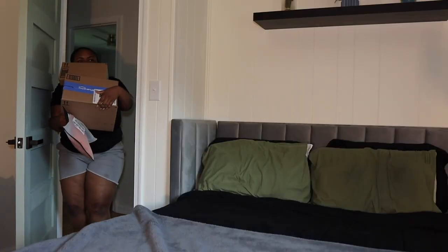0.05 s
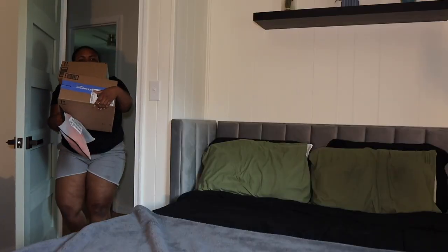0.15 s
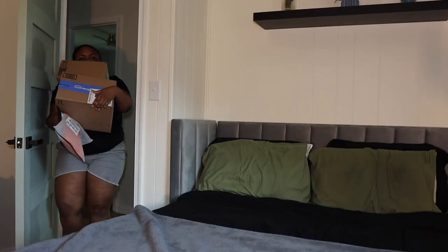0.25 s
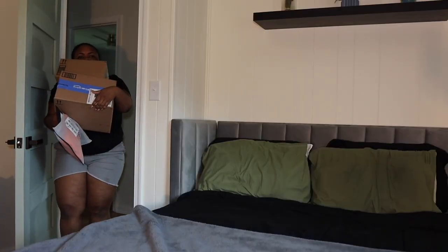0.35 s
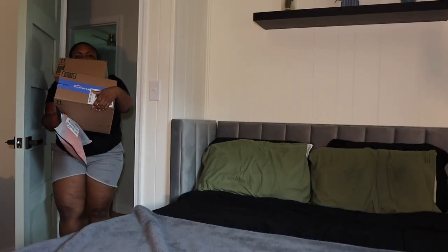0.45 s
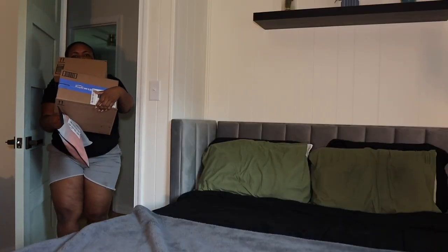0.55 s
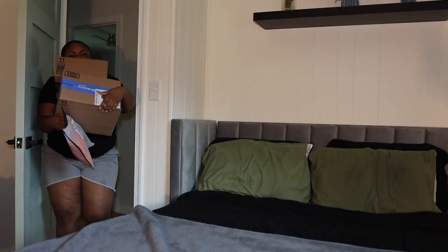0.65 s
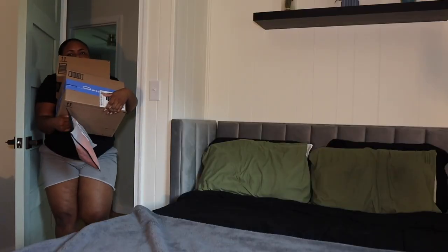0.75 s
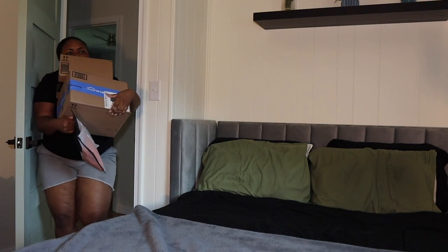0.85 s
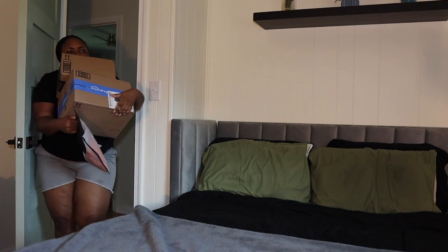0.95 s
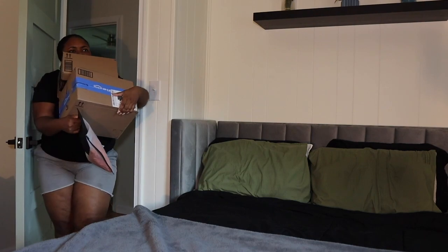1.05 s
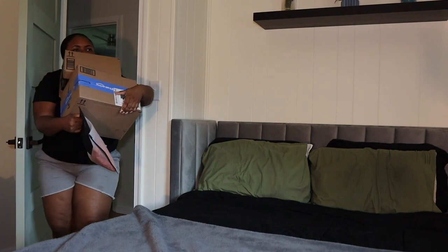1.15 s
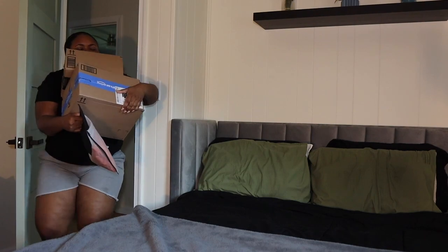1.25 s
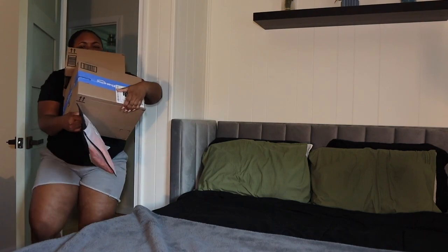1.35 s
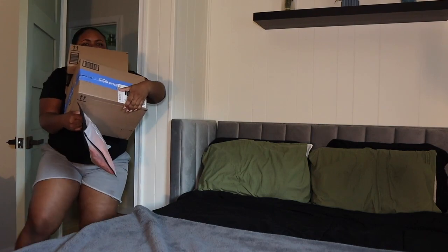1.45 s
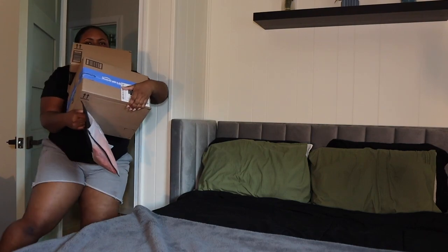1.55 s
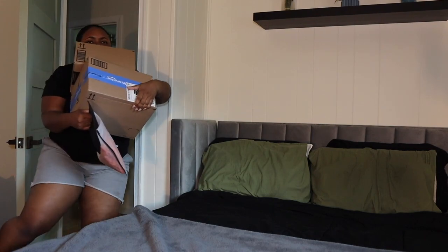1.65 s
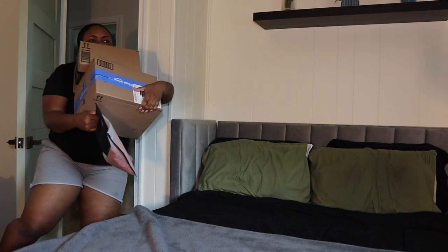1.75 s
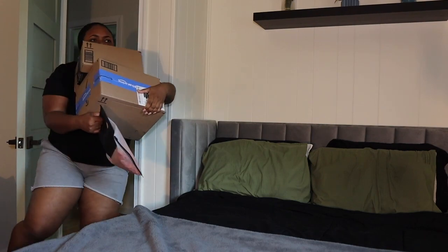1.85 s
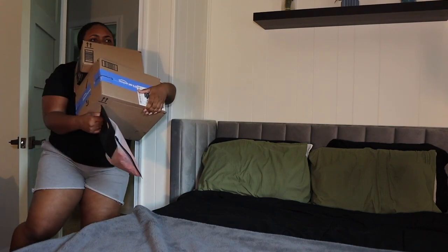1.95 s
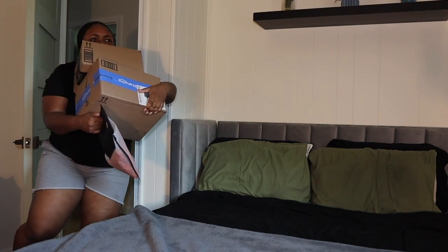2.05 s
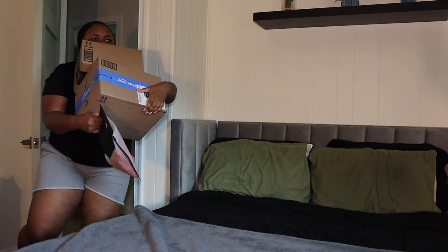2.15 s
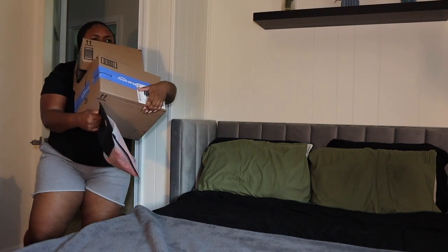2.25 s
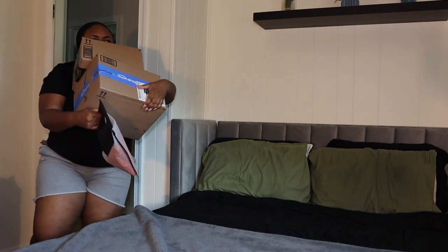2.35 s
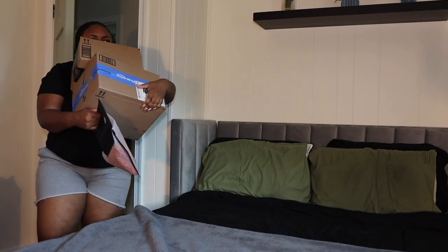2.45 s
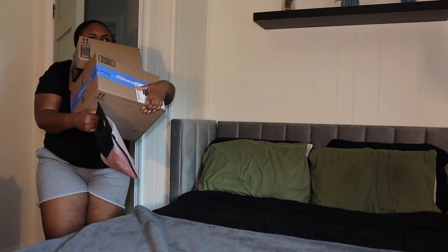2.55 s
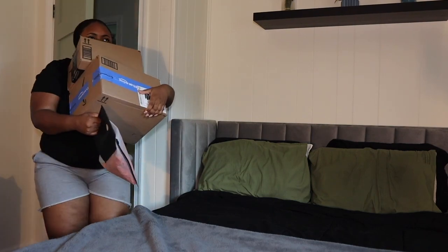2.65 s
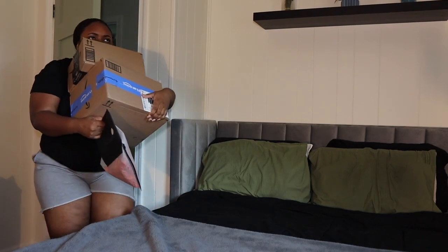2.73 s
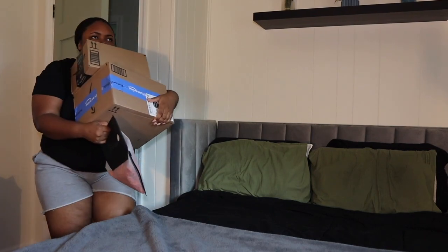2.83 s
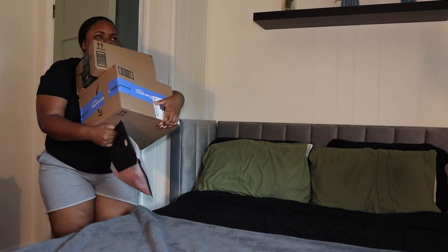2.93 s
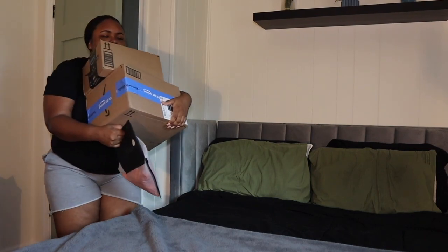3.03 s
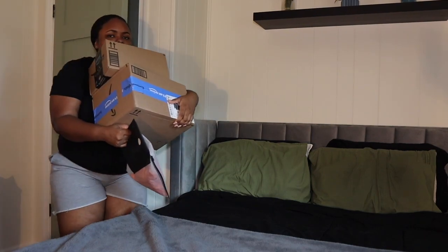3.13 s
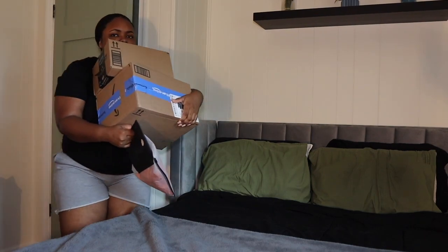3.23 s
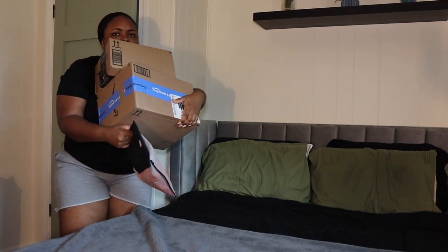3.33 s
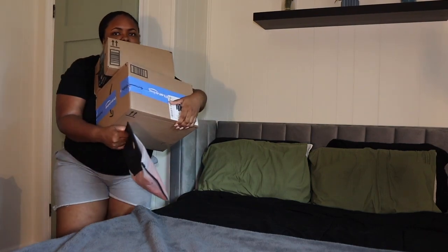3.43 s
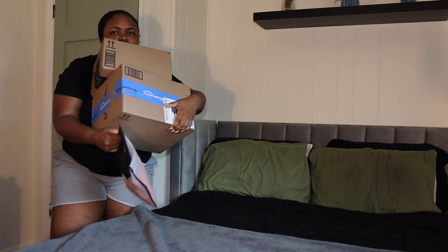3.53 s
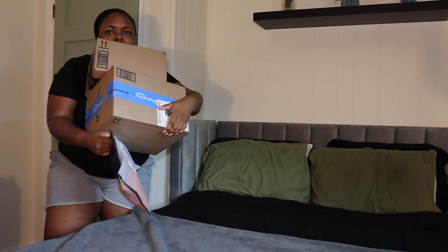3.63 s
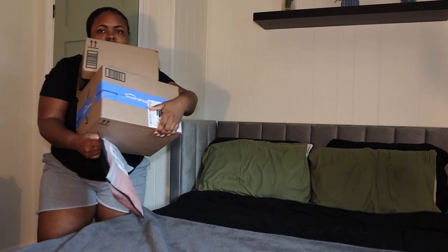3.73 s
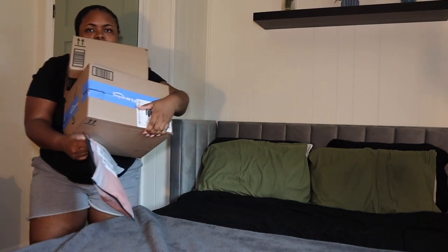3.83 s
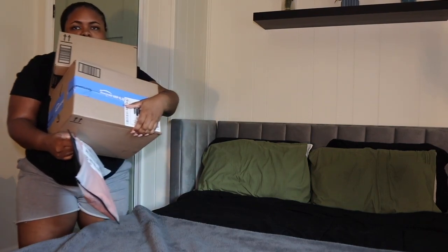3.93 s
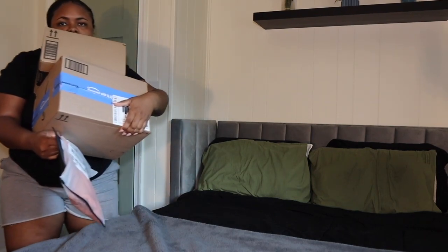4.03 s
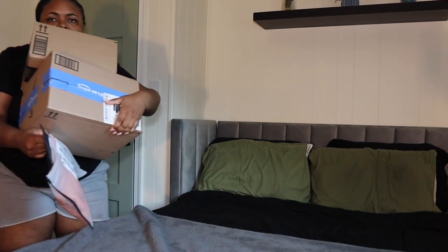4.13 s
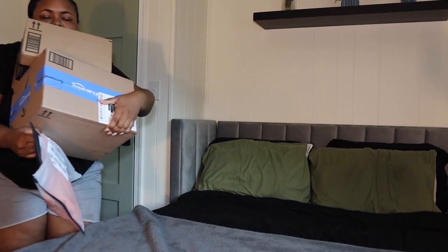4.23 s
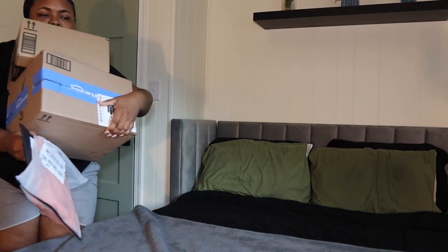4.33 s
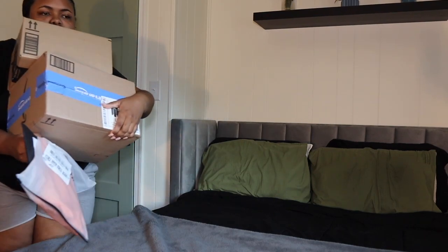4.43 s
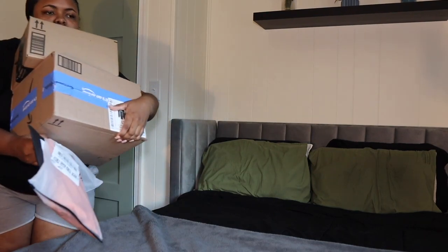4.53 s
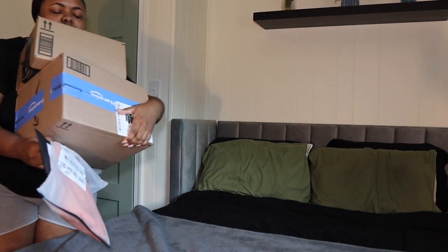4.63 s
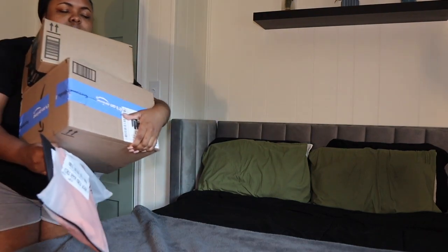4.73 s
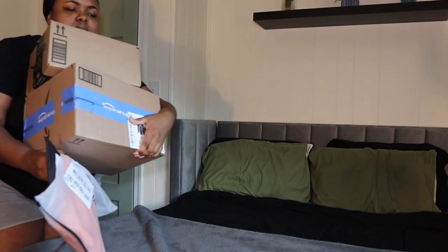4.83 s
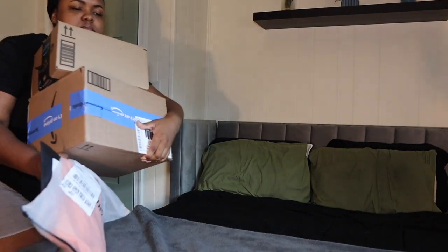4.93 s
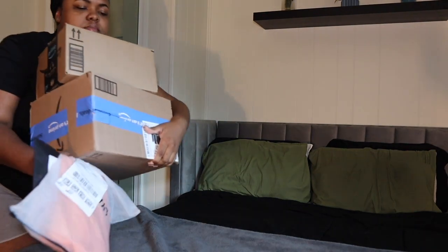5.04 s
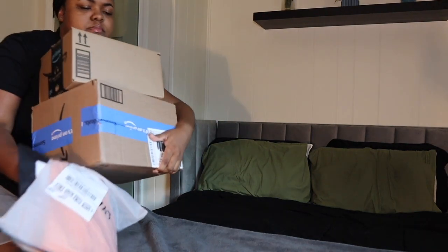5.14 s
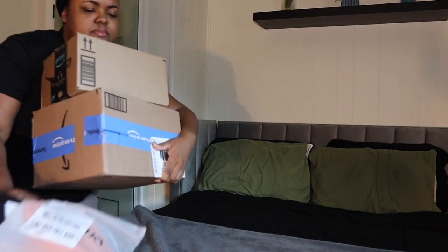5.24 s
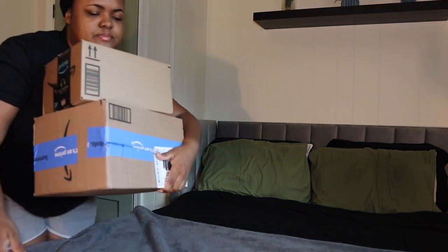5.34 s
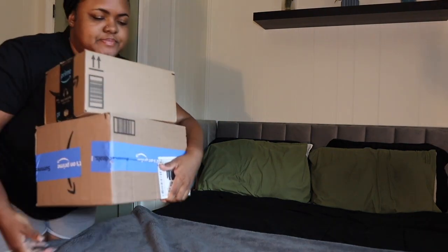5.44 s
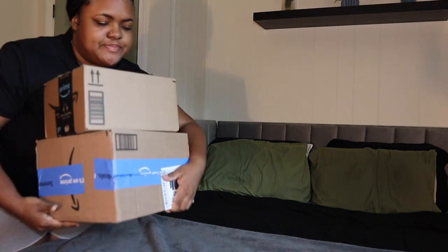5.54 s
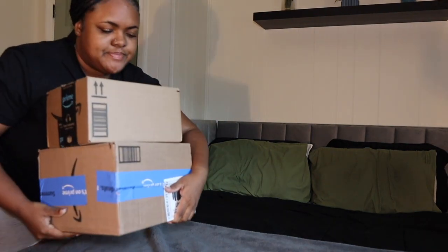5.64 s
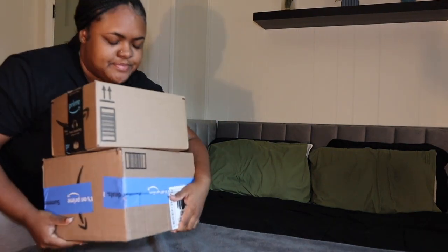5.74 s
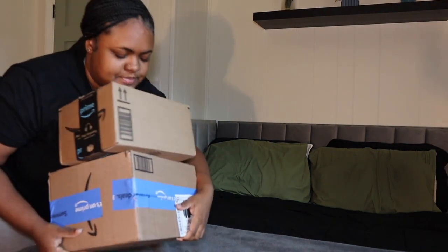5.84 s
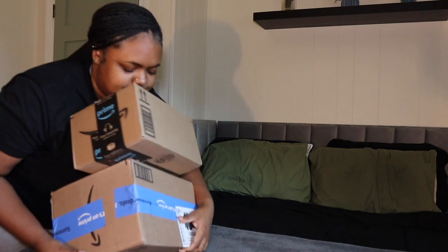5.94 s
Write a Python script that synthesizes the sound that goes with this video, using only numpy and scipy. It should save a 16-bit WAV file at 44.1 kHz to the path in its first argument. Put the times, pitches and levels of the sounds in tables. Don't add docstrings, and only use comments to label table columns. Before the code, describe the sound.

Someone carries boxes indoors: soft slipper steps, dull floor thumps, faint cloth and plastic rustle over steady air hum. A hollow door hits its frame, then latches in a quick, bright double strike. After a quieter stretch, the load arrives near the stereo microphone with loud crinkling, dry cardboard scraping and several hollow knocks; short, damped room echo.

```python
import sys
import numpy as np
from scipy import signal
from scipy.fft import rfft, irfft, next_fast_len
from scipy.io import wavfile

SR = 44100
rng = np.random.default_rng(int(sys.argv[2]) if len(sys.argv) > 2 else 0)


def voltage_ratio(decibels):
    exponent = np.asarray(decibels, float) / 20
    return 10 ** exponent


def inscribe(sig):
    pcm = np.round(np.clip(np.atleast_2d(sig).T, -1, 1) * 32767)
    wavfile.write(sys.argv[1], SR, pcm.astype(np.int16))


N = 263718

# pitch in Hz, level in dB per Hz.
AIR = [(12, -22.5), (20, 6), (74, -7), (121, -2), (211, -10.5), (278, -4.5), (889, -14.5), (1590, -22),
       (1880, -22), (5530, -35), (7930, -50), (10200, -61), (11700, -70), (15000, -87.5)]
# pitch in Hz, width in Hz, rms level in dB.
HUM = [(58.3, 20, -57), (123.4, 11.4, -49.5), (280, 35, -64.5)]
AIR_DB = -47

# pitch in Hz, time to fall by 60 dB in seconds.
ROOM_ECHO = [(60, 0.64), (250, 0.27), (1000, 0.2), (4000, 0.29), (11000, 0.2)]
ROOM_DB, RUB_SEND_DB, LATCH_SEND_DB, BOARD_SEND_DB = -6, -4.5, -8, -1.0

# pitch in Hz, side minus mid in dB.
WIDENING = [(40, -34), (90, -23), (180, -15), (350, -9), (700, -4), (1400, -2), (2200, 1), (3200, 4),
            (4500, 6), (6500, 6), (9000, 6), (11500, 7), (13500, 7), (15500, 0)]
# pitch in Hz, width in Hz, height in dB.
CAPSULE = [(10290, 1460, 9), (12460, 4200, -9.5), (1478, 360, 3), (4160, 460, 1), (7100, 8200, -1.5)]
LEFT_SHARE = 0.28
TOP_HZ = 14500

# start in seconds, peak in dB, pitch in Hz,
# time to fall by 60 dB in seconds.
FLOOR_THUMPS = [(0.521, -35, 38.4, 0.77), (1.13, -9, 38.6, 0.11), (1.169, -27, 30.1, 0.58),
                (1.38, -26, 33, 0.13), (1.904, -21.5, 62.4, 0.3), (2.022, -32, 63.2, 0.81),
                (2.685, -21.5, 32.3, 0.21), (3.51, -30.5, 53.3, 0.51), (3.74, -25, 40.8, 0.7),
                (3.767, -20.5, 59.6, 0.31), (3.818, -24.5, 47.4, 0.24), (5.59, -26, 57.6, 0.18)]
# start in seconds, peak in dB, pitch in Hz.
PANEL_THUMPS = [(.235, -33, 302), (0.601, -31, 334), (1.131, -31.5, 280), (1.92, -21.5, 165.4),
                (3.465, -14.5, 228.5), (3.468, -19, 153), (1.93, -31.5, 250), (3.79, -28.5, 202),
                (5.44, -33, 280), (3.734, -25, 295), (3.753, -25.5, 105), (5.251, -24, 237),
                (5.588, -21.5, 159), (5.605, -23.5, 216), (5.749, -28, 252), (5.939, -32, 250)]
# start in seconds, peak in dB,
# pitch in Hz.
HARD_TAPS = [(2.679, -27.5, 1070), (3.466, -22.5, 1350), (3.473, -18, 1653), (3.482, -20, 1080),
             (3.674, -17, 1900), (3.688, -25, 1450), (3.695, -20, 2125), (3.852, -45, 1710),
             (3.922, -40, 1600), (5.441, -29.5, 1100), (5.9, -35, 844), (5.945, -25, 570),
             (5.965, -28, 1080), (3.847, -41, 1410), (3.884, -40, 1560), (3.917, -39, 1320)]
PANEL_CYCLES, TAP_T60_S = 23.8, 0.033

# (negative: seconds to swell by 20 dB, with a shorter fade).
RUBS = [(0.01, -46, 0.4), (.124, -45.5, .2), (.25, -48.5, 0.24), (1.95, -51, 0.6), (.45, -62, 8),
        (.53, -46, 0.45), (.9, -49.5, .4), (1.29, -46.5, 0.4), (1.41, -48.5, .06), (1.8, -47, 0.2),
        (2.3, -50, 0.2), (2.66, -46.5, 0.5), (3.01, -54, -0.7), (3.11, -49, -0.58), (3.37, -52.5, -3.5),
        (4.306, -49, 0.4), (4.53, -53.5, 0.5), (4.78, -42, 0.24), (5.01, -40, 0.24), (5.112, -29, 0.13),
        (5.225, -40.5, 0.12), (5.29, -34.5, .04), (5.348, -29, 0.0551), (5.44, -28, 0.177),
        (5.5, -33, 0.07), (5.585, -34, 0.13), (5.754, -30.5, 0.15), (5.97, -28, 0.37)]
# time of the peak in seconds, level in dB, seconds to fade by 20 dB
# (negative: seconds to swell by 20 dB, with a shorter fade), crispness in dB.
CRINKLES = [(.05, -59, .25, 4), (.18, -52.5, -0.4, -3), (.53, -68, -8, -10), (.74, -56, .3, -1),
            (1.2, -58, .2, 1), (1.28, -55, .15, -3.5), (1.386, -52, .04, -7), (1.68, -50, .07, -5),
            (1.82, -58, .15, 5), (2.27, -57.5, .15, 3), (1.1, -60, .1, 4), (2.67, -52, 0.5, -2),
            (3.01, -54.5, 0.16, -14.5), (3.21, -62.5, 0.46, 4.5), (4.316, -54.5, 1.04, -4),
            (3.9, -58, .3, -9), (4.764, -45.5, 0.32, -3), (4.87, -53.5, 0.25, 4), (5.02, -42, 0.13, 2.5),
            (5.114, -29.5, 0.0854, -4.5), (5.24, -53, -1.32, -28), (5.312, -41, 0.1, -12),
            (5.368, -31, 0.18, -8), (5.46, -33.5, 0.2, -26), (5.587, -37.5, 0.04, 3.5),
            (5.68, -38.5, -0.16, -14), (5.8, -36, 0.38, -4), (5.948, -30, 0.35, 1)]
# pitch in Hz, width in Hz, height in dB.
CARDBOARD = [(250, 39, 8), (543, 43, 1), (1067, 85, -0.5), (1560, 250, -7), (2160, 60, -6)]
RUB_REST_DB, CRINKLE_REST_DB = -69, -70
RISE_SHARE = 0.82
LONGEST_FADE_S = 0.4

EDGES_HZ = [150, 600, 2500, 7000, 14500]
# start in seconds, middle-band peak in dB, then lows, highs and top
# relative to it in dB.
SNAPS = [(0.219, -32, -3, -10, -25), (0.545, -28, -3, -24.5, -22), (0.635, -50.5, -14, -18, -27),
         (1.915, -30.5, -5.5, -13, -16), (2.561, -48, -7, 14.5, 9), (2.675, -33.5, -6, -17, -23),
         (3.442, -30, -4, 1, -2), (3.983, -42, -13, -11, -2.5), (4.507, -32, -19.5, -22, -28),
         (5.259, -17.5, 1, -40, -45), (5.304, -35, -15.5, 1, -2), (5.313, -29, -8, 0.5, -8),
         (5.332, -19, -21.5, -17, -28), (5.345, -16.5, -25, -33.5, -23), (5.367, -24, -23, -5, -4),
         (5.397, -22, -7, -18, -29), (5.588, -30, 0, -22, -20), (0.568, -26, 0, -13, -24),
         (3.448, -32, -10, -5, -8), (5.3407, -19, -24.5, -23, -12)]

# pitch in Hz, level in dB, time to fall by 60 dB in seconds before
LATCH = [(2070, 13, 0.25), (3010, 8.5, 0.355), (4260, 12.5, 0.14), (5430, -6, 0.15), (6800, -21.5, 0.18),
         (6560, -31.5, 0.19), (7740, -7, 0.38), (7200, -6, 0.29), (8300, -15.5, 0.11), (9500, -15, 0.11),
         (8830, 2, 0.089), (9600, -20, 0.17), (10600, -5, 0.3), (10570, -6, 0.12),
         (1315, -10, 0.42), (1470, 1, 0.47), (1900, -4, 0.29), (2676, 4.5, 0.69), (4666, 7, 0.27)]
# start in seconds, level in dB.
LATCH_SNAPS = [
    (3.464, -32.5),
    (3.67, -38),
    (3.677, -32),
    (3.685, -21.5),
]
LATCH_DAMPING = 0.07

# start in seconds, middle-band peak in dB, lows and highs relative
# to it in dB, contact time in seconds.
STEPS = [(0.087, -44, 8, -18, 0.011), (0.22, -35.5, 4.5, 6, .01), (.242, -39, 4, -15, 0.018),
         (0.541, -29, -10, 2, 0.0093), (0.599, -30.5, -1, -22.5, .008), (0.632, -32.5, -15, -2, .009),
         (0.914, -47, 8, -17, .014), (1.137, -35, -13.5, 0, .013), (1.379, -39.5, -16, -3, .014),
         (1.674, -41.5, -5, 10, 0.019), (1.914, -29.5, 0.5, 0.5, 0.02), (2.673, -26, -6.5, -4.5, .015),
         (2.993, -43.5, -12, -18, .014), (3.365, -44.5, 8, 0, 0.014), (4.315, -39, -1, 7, .012),
         (4.508, -36, -5, -16.5, .009), (4.699, -42.5, -5, 6, .026)]
# start in seconds, middle-band peak in dB, then lows and highs
# relative to it in dB.
KNOCKS = [
    (3.742, -24, -9, 3),
    (5.084, -38, -11, -26),
    (5.266, -25.5, -16, -17),
    (5.392, -25, -26, -21),
    (5.438, -17, -5, 4),
    (5.456, -15, -34.5, -4),
    (5.582, -21, -2.5, -19),
]
# start in seconds, middle-band peak in dB, then lows, highs and top
# relative to it in dB.
DOOR_BLOWS = [
    (3.458, -18, -3.5, -0.5, -16),
    (3.465, -27, -4.5, 16, -34.5),
    (3.471, -15.5, -9, -33, -20),
    (3.481, -27.5, 4, -37, -32),
    (3.663, -24.5, -21, 3, -26),
    (3.67, -17.5, -29, 12.5, -25),
    (3.675, -16.5, -7, -25, -8),
    (3.681, -19, -35, -34.5, 3.5),
]
STEP_TOP_DB, KNOCK_TOP_DB = -18, -28
KNOCK_CONTACT_S = 0.013
DOOR_CONTACT_S, LATCHING_S = 0.016, 0.031


def rms_one(x):
    return x / np.sqrt(np.mean(x ** 2) + 1e-20)


def at_hz(points, hz):
    table_hz, values = np.array(points).T
    return np.interp(np.log(np.maximum(hz, 1)), np.log(table_hz), values)


def colour(x, points):
    size = next_fast_len(N + 4096)
    gain = voltage_ratio(at_hz(points, np.fft.rfftfreq(size, 1 / SR)))
    return irfft(rfft(x, size) * gain, size)[..., :N]


def band(x, low, high):
    sos = signal.butter(2, [low, high], "band", fs=SR, output="sos")
    return signal.sosfilt(sos, x + 1e-18) * np.sqrt(SR / 2 / (high - low))


def resonance(x, hz, width):
    r = np.exp(-np.pi * width / SR)
    top = np.array([1, 0, -1]) * (1 - r * r) / 2
    return signal.lfilter(top, [1, -2 * r * np.cos(2 * np.pi * hz / SR), r * r], x)


def peaks(x, modes):
    for hz, width, db in modes:
        x = x + (voltage_ratio(db) - 1) * resonance(x, hz, width)
    return x


def drift(rate):
    r = np.exp(-80 * np.pi * rate / SR)
    noise = rng.standard_normal(N // 40 + 2002)
    slow = signal.lfilter([1], [1, -2 * r, r * r], noise)[2000:]
    return np.interp(np.arange(N) / 40, np.arange(len(slow)), rms_one(slow))


def grains(shape, share, spread_db):
    sizes = voltage_ratio(spread_db * np.minimum(rng.exponential(1, shape), 4))
    sizes = sizes * rng.choice([-1, 1], shape)
    return rms_one(sizes * (rng.random(shape) < share))


def scatter(x, lags):
    for lag in lags:
        poles = np.r_[1, np.zeros(lag - 1), 0.55]
        x = signal.lfilter(poles[::-1], poles, x)
    return x


def strokes(rows, rest_db):
    t = np.arange(0, N + 32, 32) / SR
    power = voltage_ratio(2 * rest_db)
    for s, db, fade in rows:
        fade = min(fade, LONGEST_FADE_S)
        drop = np.maximum((t - s) / fade, (s - t) / (RISE_SHARE * fade))
        power = power + voltage_ratio(2 * (db - 20 * drop))
    return np.interp(np.arange(N) / SR, t, np.sqrt(power))


def ventilation():
    air = rms_one(colour(rng.standard_normal((2, N)), AIR))
    out = voltage_ratio(AIR_DB) * air * voltage_ratio(0.6 * drift(3))
    for hz, width, db in HUM:
        line = resonance(rng.standard_normal((2, N)), hz, width)
        out = out + voltage_ratio(db) * rms_one(resonance(line, hz, width))
    return out


def bedroom(x):
    t, tail = np.arange(SR // 2) / SR, 0
    noise = rng.standard_normal((2, 2, len(t)))
    for k, hz in enumerate(90 * 2 ** np.arange(8)):
        t60 = at_hz(ROOM_ECHO, hz)
        octave = band(noise[k % 2], hz / np.sqrt(2), hz * np.sqrt(2))
        tail = tail + octave * np.sqrt(hz / t60) * voltage_ratio(-60 * t / t60)
    tail = tail * np.minimum(1, t / 0.004)
    tail = tail / np.sqrt(np.sum(tail ** 2, axis=1, keepdims=True))
    return signal.fftconvolve(x[None], tail, axes=1)[:, :N]


def housing(x):
    return scatter(x, [3, 7, 17, 31])


def thumps():
    out, t = np.zeros(N + SR), np.arange(SR) / SR
    panels = [(*row, PANEL_CYCLES / row[2]) for row in PANEL_THUMPS]
    taps = [(*row, TAP_T60_S) for row in HARD_TAPS]
    for s, db, hz, t60 in [*FLOOR_THUMPS, *panels, *taps]:
        push = np.minimum(1, t * hz * 1.1)
        swing = -np.sin(2 * np.pi * hz * t) * voltage_ratio(-60 * t / t60) * push
        out[round(s * SR):][:SR] += voltage_ratio(db) * swing
    return out[:N]


def rubbing():
    rub = strokes(RUBS, RUB_REST_DB)
    crinkle = strokes([row[:3] for row in CRINKLES], CRINKLE_REST_DB)
    crisp_rows = [(s, db + crisp_db, fade) for s, db, fade, crisp_db in CRINKLES]
    crisp = strokes(crisp_rows, CRINKLE_REST_DB - 3.5)
    fibres = grains(N, share=0.2, spread_db=3.0) * voltage_ratio(1.6 * drift(29))
    walls = [(hz, width, db + 7.0) for hz, width, db in CARDBOARD]
    body = rms_one(peaks(band(fibres, 233, 2130), walls))
    plastic = rms_one(band(fibres, 1670, 8940))
    sizzle = rms_one(band(fibres, 5160, 12060))
    return voltage_ratio(-4.5) * rub * body - voltage_ratio(-9.0) * crinkle * plastic + voltage_ratio(-6.5) * crisp * sizzle


def snaps():
    out = 0
    for k, gain_db in enumerate([-8.5, -2.5, -7, 3.5]):
        train, low, high = np.zeros(N), EDGES_HZ[k], EDGES_HZ[k + 1]
        for s, db, lows, highs, top in SNAPS:
            train[round(s * SR)] -= voltage_ratio(db + [lows, 0, highs, top][k] + gain_db)
        click = band(train, low, high) * np.sqrt(SR / 2 / (high - low))
        out = out - (-1) ** k * click
    return scatter(out, [11, 23])


def latch():
    out, t = np.zeros(N), np.arange(SR // 2) / SR
    modes = LATCH
    chance = rng.normal(0, 3, (len(LATCH_SNAPS), len(modes)))
    for (s, db), row in zip(LATCH_SNAPS, chance):
        for (hz, mode_db, t60), extra_db in zip(modes, row):
            fading = voltage_ratio(db + mode_db + extra_db - 60 * t / (LATCH_DAMPING * t60))
            out[round(s * SR):][:len(t)] += fading * np.sin(2 * np.pi * hz * t)
    return out


def contacts():
    rows = [(*row[:-1], STEP_TOP_DB, row[-1]) for row in STEPS]
    rows += [(*row, DOOR_CONTACT_S) for row in DOOR_BLOWS[:4]]
    rows += [(*row, LATCHING_S) for row in DOOR_BLOWS[4:]]
    rows += [(*row, KNOCK_TOP_DB, KNOCK_CONTACT_S) for row in KNOCKS]
    t, out = np.arange(6000) / SR, 0
    crowd = grains((len(rows), len(t)), share=0.27, spread_db=2.5)
    for k, (stretch, gain_db) in enumerate([(1.58, -2.5), (0.84, -5.0), (0.24, -10.5), (0.23, 2)]):
        train = np.zeros(N + len(t))
        for (s, db, low, high, top, length), clicks in zip(rows, crowd):
            phase = t / np.clip(stretch * length, 0.0005, 0.06)
            shape = (1 - np.exp(-phase * 4)) * np.exp(-phase * 1.14)
            level = voltage_ratio(db + [low, 0, high, top][k] + gain_db)
            train[round(s * SR):][:len(t)] += level * shape * clicks
        out = out + (-1) ** k * band(train[:N], EDGES_HZ[k], EDGES_HZ[k + 1])
    return out


def scene():
    air_mid, air_side = ventilation()
    boards, rubs, steel = thumps(), rubbing(), latch()
    blows = contacts() + snaps()
    struck = blows + steel + rubs
    send = blows + voltage_ratio(LATCH_SEND_DB) * steel + voltage_ratio(RUB_SEND_DB) * rubs + voltage_ratio(BOARD_SEND_DB) * boards
    wet_mid, wet_side = bedroom(send)
    mid = struck + boards + voltage_ratio(ROOM_DB) * wet_mid + air_mid
    side = LEFT_SHARE * struck + 0.863 * housing(struck) + voltage_ratio(-3.0) * wet_side + air_side
    side = colour(side, WIDENING)
    return np.array([mid + side, mid - side])


def low_pass(x):
    return signal.sosfilt(signal.butter(12, 15720, fs=SR, output="sos"), x)


def record(dry):
    roll_off = signal.butter(4, TOP_HZ, fs=SR, output="sos")
    heard = signal.sosfilt(roll_off, peaks(dry, CAPSULE))
    return low_pass(np.clip(heard, -1, 1))


dry = scene()
out = record(dry)
inscribe(out)
```